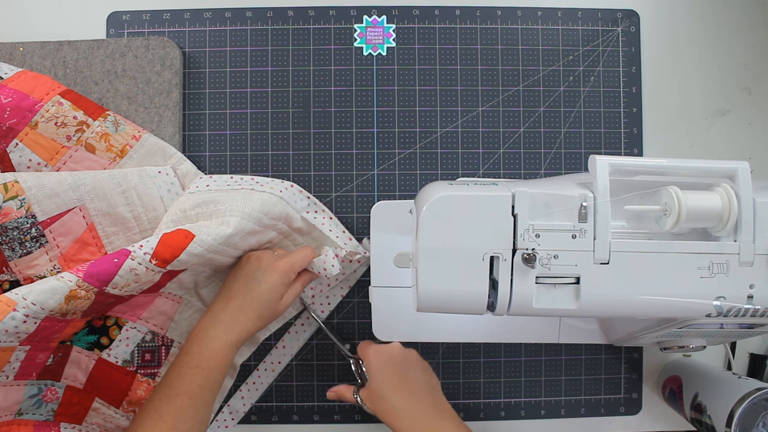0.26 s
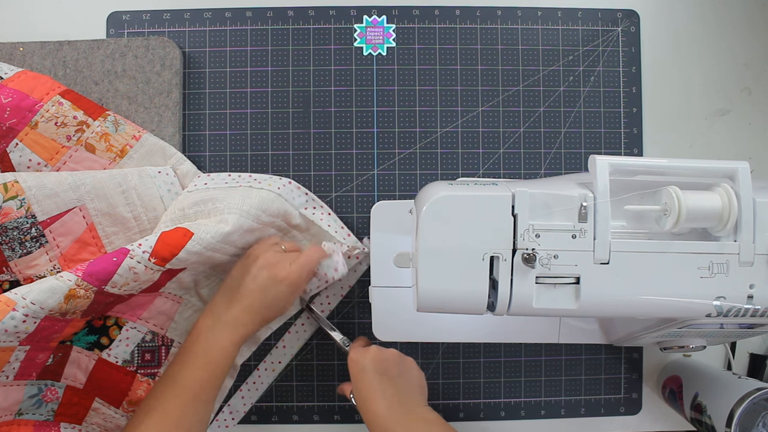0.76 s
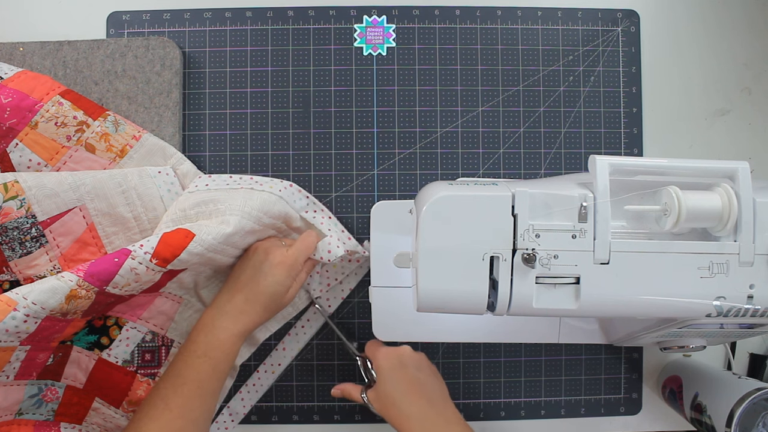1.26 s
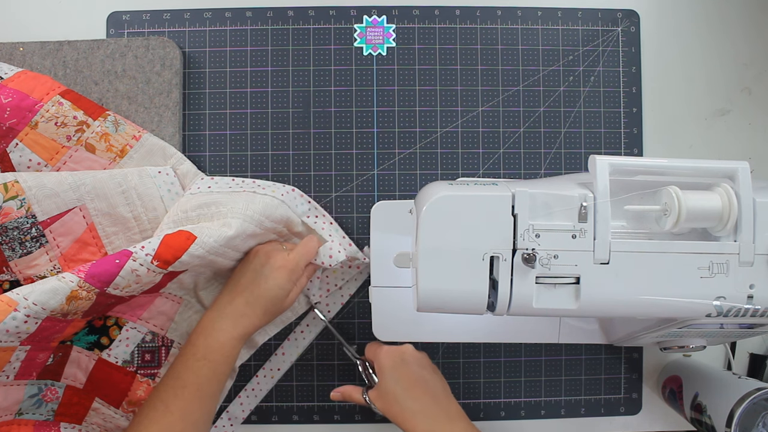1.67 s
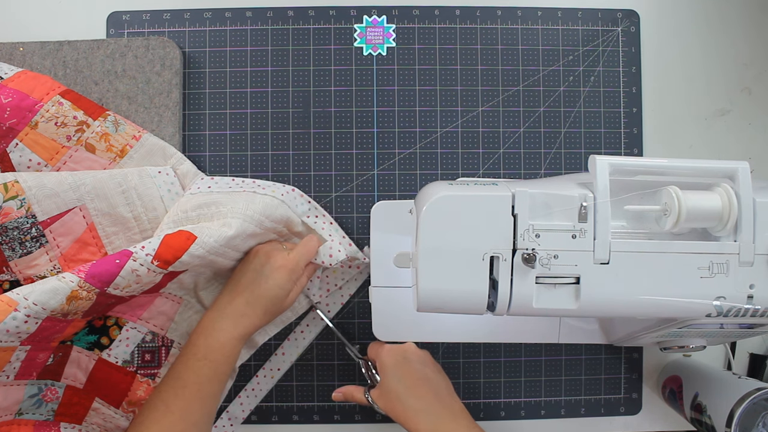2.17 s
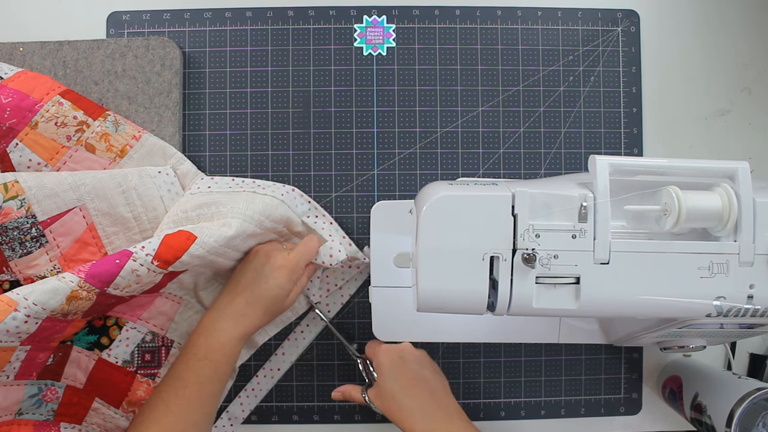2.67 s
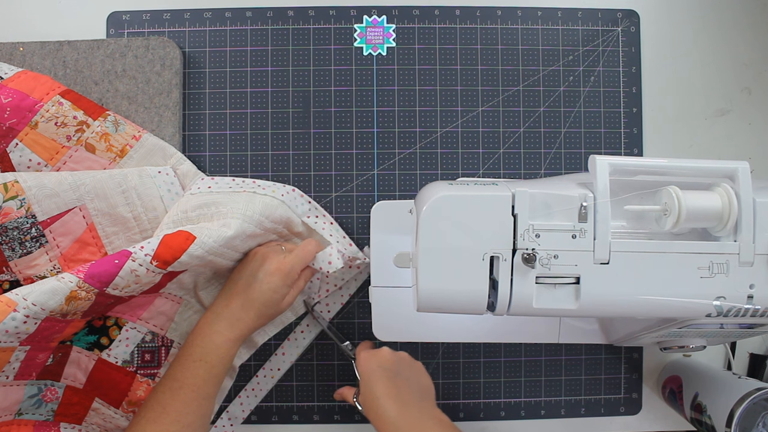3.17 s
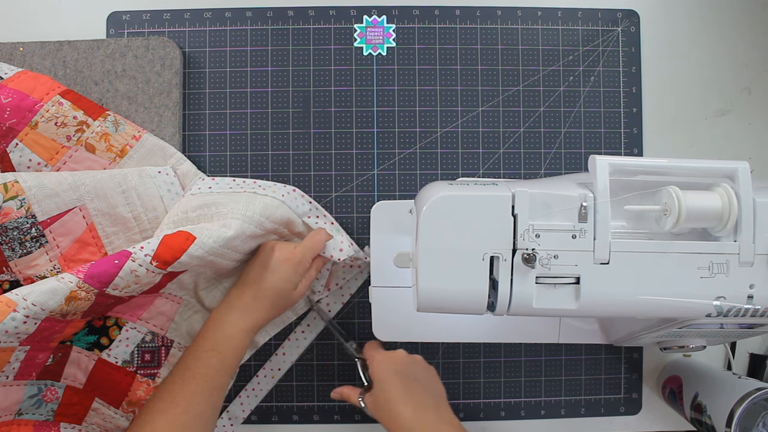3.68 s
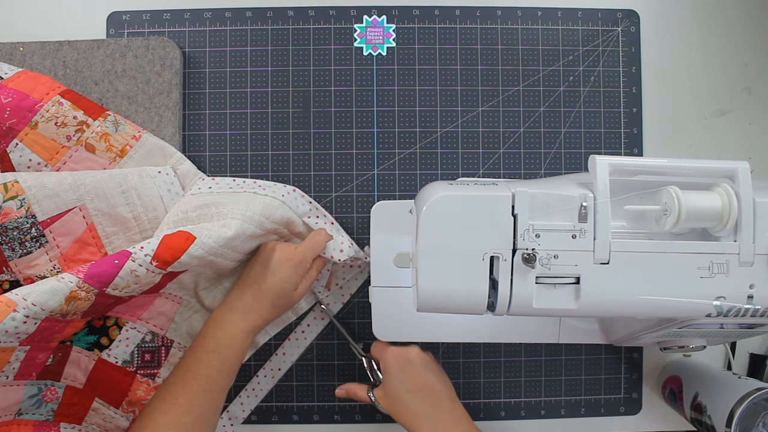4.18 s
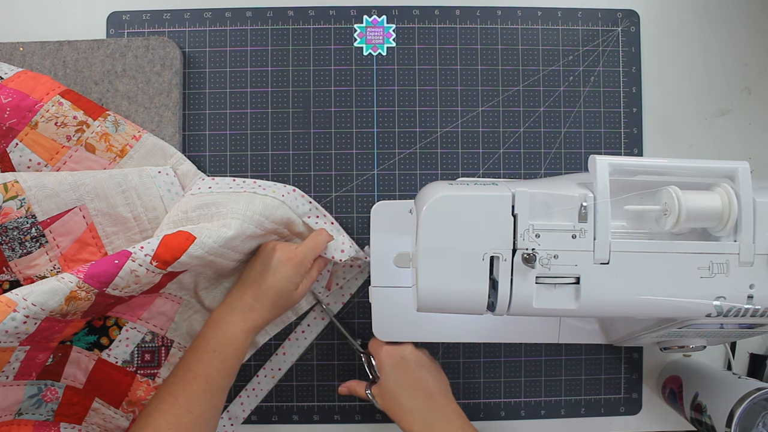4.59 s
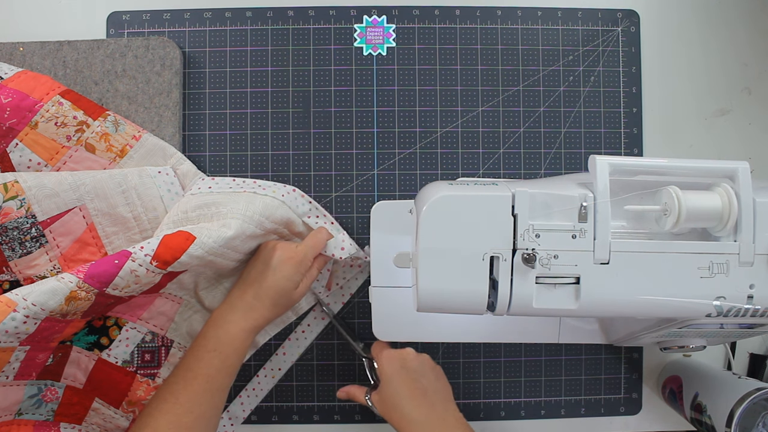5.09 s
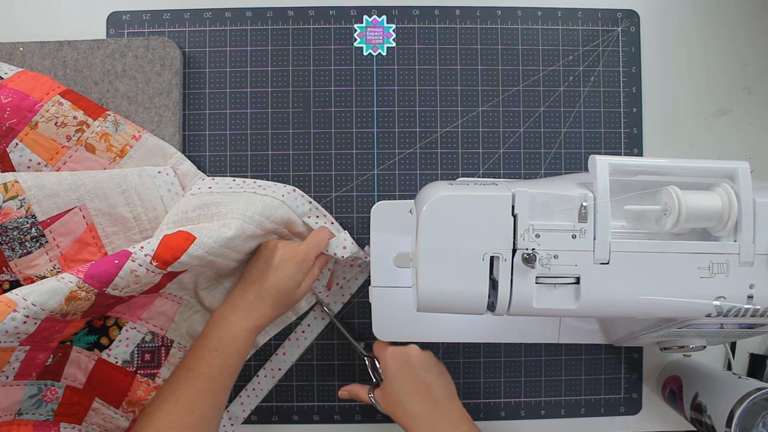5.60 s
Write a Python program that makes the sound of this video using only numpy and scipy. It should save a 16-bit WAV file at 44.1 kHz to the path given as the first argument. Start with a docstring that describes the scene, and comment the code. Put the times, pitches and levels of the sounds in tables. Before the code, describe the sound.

A steady faint hiss with slight low room rumble runs throughout, with barely audible cotton rustle. At about 0.33 s scissor edges scrape through thread, and at 0.35 s the blades snap shut with a loud, bright, very short metallic crack and tiny ping. At 0.48 s a hand thumps the table, dull and woody, followed by small bumps and rustles from 0.6 to 0.9 s and a faint mat tap at 1.0 s. Around 1.64 s the handles knock with a hollow click. Quiet follows, with tiny touches near 2.4 s. At 2.84 s a crunchy scrape leads into the second snap, the loudest and brightest. Soft taps and bumps cluster from 3.0 to 3.4 s, with a slight scrape at 3.6 s. At 4.5 s a thin squeaky scrape precedes a much weaker snip at 4.57 s, then faint scrapes until 4.85 s. Mostly hiss remains, with a barely perceptible rub at 5.4 s. Small room, one overhead microphone.

```python
"""A steady hiss and a faint rustle of cloth come first; then large steel scissors snip a quilt seam.
The scissors are mode sums and shaped noise: edges scrape through thread, blades snap shut and ring briefly.
Hands bump the sewing table (damped modes), tap and rub the cutting mat (resonant noise) and shift the quilt;
the handles knock. A small quiet room answers with decaying noise, under one overhead microphone."""
import sys
import numpy as np
from scipy import signal
from scipy.fft import rfft, irfft, next_fast_len
from scipy.io import wavfile
from scipy.ndimage import uniform_filter1d, map_coordinates

SR = 44100
rng = np.random.default_rng(int(sys.argv[2]) if len(sys.argv) > 2 else 0)


def put_to_file(sound):
    """Save the sound as 16-bit audio at rate SR, in the file named by the first command-line argument."""
    columns = np.atleast_2d(sound).T  # one column per channel
    safe = np.clip(columns, -1, 1)
    whole_steps = np.round(safe * 32767)
    wavfile.write(sys.argv[1], SR, whole_steps.astype(np.int16))


N = 257720
T = np.arange(SR // 2) / SR  # time within one event, s

# Still room, relative spectrum: frequency_hz, density_db (per Hz)
STILL_SPECTRUM = [(12, -19), (20, -11), (55, -9), (113, -2.5), (181, -6), (284, -3.5), (335, -5.5),
                  (570, -8), (733, -8), (843, -9.5), (916, -9.5), (2000, -11), (5470, -12), (13700, -17),
                  (15800, -22)]
STILL_DB = -61  # rms level
# Reverberation of the room: frequency_hz, t60_s
ROOM_DECAY = [(120, 0.23), (600, 0.39), (2500, 0.093), (5000, 0.18), (13000, 0.13), (16000, 0.052)]
TOP_HZ = 15900  # band limit of the recorder

# Hands shifting the quilt over the mat: middle_s, half_length_s, rustle_db, rub_db, rub_pitch_hz
STROKES = [(.1, 0.062, -63, -83, 892), (.57, 0.14, -62, -66.5, 755), (.695, 0.034, -65, -54, 740),
           (.785, 0.033, -59, -65, 754), (0.892, 0.054, -56, -65, 1000), (1.16, 0.053, -63, -78, 900),
           (1.4, .13, -60.5, -71.5, 910), (2.44, 0.095, -75, -70.5, 950), (3.26, 0.22, -62.5, -70, 795),
           (3.5, 0.081, -69.5, -67, 4900), (4.425, .06, -69, -68.5, 1010), (5.435, 0.03, -78.5, -69, 920)]
# Cloth friction, relative spectrum: frequency_hz, density_db (per Hz)
CLOTH_SPECTRUM = [(100, -1.5), (400, -1.5), (1000, -0.5), (2000, 0), (5000, -4), (9000, -10), (14000, -5),
                  (16000, -14)]

# Fingertips tapping the cutting mat: start_s, level_db, pitch_hz, tick_db
TAPS = [(0.4704, -58, 1180, -47), (1.0118, -51, 1160, -54), (2.376, -60.5, 1200, -62),
        (3.187, -56, 990, -59), (3.246, -52, 815, -67), (3.297, -56, 850, -63)]
NUDGE_DB, NUDGE_HZ = -2.5, 1000  # the table under a tap: level over the tock, softness cut-off
# Hard contact on the mat, relative spectrum: frequency_hz, density_db (per Hz)
TICK_SPECTRUM = [(600, 7.5), (1400, -4), (2200, 4.5), (5000, -0.5), (9000, -7.5), (16000, -3)]

# Handles knocking as the grip shifts: start_s, level_db
CLACKS = [(1.6442, -40), (1.6525, -53)]
# Modes of the handles: frequency_hz, relative_level_db, t60_s
HANDLE_MODES = [(660, -5.5, 0.18), (1264, -13, 0.087), (1850, -1, 0.038), (2045, -0.5, 0.047),
                (2935, -4.5, 0.11), (4060, -0.5, 0.034), (5660, -11, .06), (6900, -3, 0.016),
                (7500, 8, 0.015), (10100, -18, 0.097), (14200, -13, .04)]

# Hands and scissors bumping the table: start_s, level_db (before softening), softness_cutoff_hz, tick_db
BUMPS = [(.236, -51, 139, -80), (.477, -19.5, 380, -64), (.4944, -34.5, 348, -72), (.670, -36, 660, -61),
         (.7061, -34.5, 570, -48.5), (.773, -41, 548, -53), (2.468, -50, 402, -64), (3.04, -39.5, 148, -78),
         (3.305, -37, 610, -49.5), (3.354, -46.5, 450, -80)]
# Modes of the table: frequency_hz, relative_level_db, t60_s
TABLE_MODES = [(96.5, -39, 0.18), (121, -8, 0.24), (197, -5, 0.15), (242.2, 2.5, 0.094),
               (292, -17.5, 0.075), (379, -2, 0.051), (479, -4.5, 0.064), (521.7, 1, 0.093),
               (577, -35, 0.03), (715, 1, 0.043), (832, -11, 0.15)]

# Edges scraping over each other: peak_s, level_db, rise_s, crunch_db (dull thread crunch over the squeak)
SCRAPES = [(.145, -59, .003, 2), (.332, -37, 0.0016, -8.5), (.597, -52.5, .0034, 2),
           (1.028, -58.5, .005, -8), (2.787, -55, .002, -2), (2.801, -52.5, .0037, -6),
           (2.8386, -34, 0.0026, -4), (3.608, -52, 0.0052, 1), (4.501, -41, .0067, -16),
           (4.674, -55.5, .0059, -1), (4.847, -56, .004, -10)]
SCRAPE_FALL_S = 0.0022  # the edges stop this quickly
# The table's jolt: level over the crunch, softness cut-off, contact tick over the crunch
JOLT_DB, JOLT_HZ, JOLT_TICK_DB = -2.5, 590, -20
# Resonances of the sliding edges: frequency_hz, width_hz, level_db
EDGE_RESONANCES = [(3850, 1200, -16.5), (8200, 920, -10), (9930, 290, -3), (11990, 380, 1),
                   (15400, 880, -11.5)]
# Thread crunch, relative spectrum: frequency_hz, density_db (per Hz)
CRUNCH_SPECTRUM = [(200, -27), (1200, 3.5), (2500, 0), (5000, 1), (9000, -15), (16000, -2.5)]

# Blades snapping shut: start_s, crack_level_db, brightness_db (at 13 kHz),
# ping_hz (set by the opening), ping_db (over the crack), ping_t60_s
SNAPS = [(0.3484, -19.5, -3.5, 4510, -26.5, 0.089), (2.8495, -17.5, -0.5, 4544, -23, 0.1),
         (4.5723, -34.5, -3.5, 4130, -14, 0.046)]
RECOIL_DB, RECOIL_HZ = -30, 350  # a snap recoils into the table: level over the snap, softness cut-off
# Modes of the blades: frequency_hz, relative_level_db, t60_s
STEEL_MODES = [(2612, -8, 0.039), (3480, -10, 0.033), (4230, -5, 0.021), (4640, -15, 0.03),
               (5410, -10.5, 0.039), (5670, -20, 0.03), (6310, -16.5, 0.062), (6490, -15, 0.027),
               (7280, -21, 0.036), (7750, -13.5, 0.031), (9090, -10, 0.037), (10480, -8, 0.028),
               (11760, 2, 0.022), (12300, -23, 0.037), (12120, -31, 0.014), (13170, 5, .03),
               (12460, -24, .016), (14140, -30, .042), (12400, -16, .035), (14900, -30, .035)]
# Steel impact, relative spectrum: frequency_hz, density_db (per Hz)
CRACK_SPECTRUM = [(300, -12), (1400, -14), (2500, -9), (4500, -26), (6500, 3), (8500, -9.5), (10500, -3),
                  (13200, 15), (14500, 3.5), (16000, 0)]


def amp(db):
    """Decibel law: twenty decibels are a tenfold amplitude."""
    return 10 ** (np.asarray(db) / 20)


def unit(x):
    """Mean-square normalisation: scale to rms 1."""
    return x / np.sqrt(np.mean(x ** 2) + 1e-20)


def burst(x):
    """Short-time power: scale an event so that its loudest 3 ms have rms 1."""
    power = uniform_filter1d(x ** 2, size=128)
    return x / np.sqrt(power.max() + 1e-20)


def along(points, hz):
    """Logarithmic frequency scale: interpolate (Hz, value) points along it."""
    point_hz, value = np.transpose(points)
    return np.interp(np.log(hz + 1), np.log(point_hz + 1), value)


def filtered(x, response):
    """Linear filtering: multiply the spectrum of x by a response of frequency."""
    size = next_fast_len(len(x) + SR // 4)
    spectrum = rfft(x, size) * response(np.fft.rfftfreq(size, 1 / SR))
    return irfft(spectrum, size)[:len(x)]


def noise(spectrum, size):
    """Spectral shaping: white noise coloured by a spectrum, at rms 1."""
    return unit(filtered(rng.standard_normal(size), lambda hz: amp(along(spectrum, hz))))


def resonance(f, hz, width):
    """Damped oscillator: the response peaks at hz with the given bandwidth."""
    return 1j * f * width / (hz * hz - f * f + 1j * f * width)


def wobble(rate):
    """Slow random modulation: a smooth curve through `rate` random knots a second."""
    knots = rng.standard_normal(int(N * rate / SR) + 4)
    return map_coordinates(knots, [np.arange(N) * rate / SR])


def swell(t, half):
    """Gaussian stroke speed at time t from its middle: the hand gathers and eases off evenly."""
    return np.exp(-(t / half) ** 2)


def strike(rise, t60):
    """Exponential damping: a blow rises quickly, then falls 60 dB in every t60 seconds."""
    return (1 - np.exp(-T / rise)) * amp(-60 * T / t60)


def ring(modes, rise, scatter_db, blur_hz=20):
    """Modal superposition: one row per damped mode, its strength scattered and its phase drifting."""
    hz, db, t60 = np.transpose(modes)[:, :, None]
    strength = amp(db + scatter_db * rng.standard_normal(hz.shape))
    # the shifting grip blurs the high modes most: blur_hz is the line width at 10 kHz
    width = blur_hz * hz / 10000
    steps = rng.standard_normal((len(hz), len(T)))
    drift = np.cumsum(steps, axis=1) * np.sqrt(2 * np.pi * width / SR)
    return strength * strike(rise, t60) * np.sin(2 * np.pi * hz * T + drift)


def in_room(x, near_db, tail_db):
    """Reverberation: direct sound, quick scatter from table top and sewing machine, then the room's tail."""
    hz, t, grains = signal.stft(rng.standard_normal(len(T)), SR, nperseg=256)
    decay = amp(-60 * t / along(ROOM_DECAY, hz)[:, None])
    tail = signal.istft(grains * decay, SR, nperseg=256)[1][:len(T)]
    tail *= 1 - np.exp(-(T / 0.0034) ** 2)  # the tail builds up over a few milliseconds
    near = rng.standard_normal(len(T)) * strike(0.0091, 0.057)
    response = amp(near_db) * near / np.linalg.norm(near)
    response += amp(tail_db) * tail / np.linalg.norm(tail)
    return x + signal.fftconvolve(x, response)[:len(x)]


def add(track, s, sound):
    """Linear superposition: mix a sound in from time s, or from zero if s is negative."""
    part = track[max(round(s * SR), 0):][:len(sound)]
    part += sound[:len(part)]


def still_room():
    """Stationary noise: steady microphone hiss over a faint low room rumble."""
    return amp(STILL_DB) * noise(STILL_SPECTRUM, N)


def cloth():
    """Dry friction: cotton rubs on cotton with each stroke, and its fibres catch unevenly."""
    t = np.arange(N) / SR
    sliding = sum(amp(db) * swell(t - s, half) for s, half, db, rub_db, hz in STROKES)
    catching = amp(1.8 * wobble(45) + 1.44 * wobble(700))
    return sliding * unit(noise(CLOTH_SPECTRUM, N) * catching)


def rubs():
    """Friction-driven resonance: each stroke drags over the mat and swells in one broad resonance."""
    out, lead = np.zeros(N), 1 / 4
    for s, half, cloth_db, db, hz in STROKES:
        drag = rng.standard_normal(len(T))
        friction = unit(filtered(drag, lambda f: resonance(f, hz, 0.29 * hz) ** 2))
        add(out, s - lead, amp(db) * friction * swell(T - lead, half))
    return out


def taps():
    """Heavily damped resonance: a fingertip's brief touch gives a short tock."""
    out = np.zeros(N)
    for s, db, hz, tick_db in TAPS:
        touch = rng.standard_normal(len(T)) * strike(0.00037, 0.03)
        tock = burst(filtered(touch, lambda f: resonance(f, hz, 0.5 * hz) ** 2))
        add(out, s, amp(db) * in_room(tock, near_db=-10, tail_db=-10))
    return out


def clacks():
    """Modal impact: the handles give a lower, hollow click with a noisy contact tick."""
    out = np.zeros(N)
    for s, db in CLACKS:
        body = burst(ring(HANDLE_MODES, rise=0.00038, scatter_db=1.0).sum(0))
        tick = burst(noise(CRUNCH_SPECTRUM, len(T)) * strike(0.00036, 0.088))
        click = amp(-1) * body + amp(-6) * tick
        add(out, s, amp(db) * in_room(click, near_db=-12, tail_db=-13))
    return out


def table_blows():
    """Reaction forces: the table takes bumps, a jolt per scrape, a recoil per snap, a nudge per tap."""
    jolts = []
    for s, db, rise, crunch_share_db in SCRAPES:
        crunch_db = db + crunch_share_db
        jolts.append((s, crunch_db + JOLT_DB, JOLT_HZ, crunch_db + JOLT_TICK_DB))
    recoils = [(s, db + RECOIL_DB, RECOIL_HZ, -np.inf) for s, db, *tone in SNAPS]  # no tick
    nudges = [(s, db + NUDGE_DB, NUDGE_HZ, tick_db) for s, db, hz, tick_db in TAPS]
    blows = list(BUMPS) + jolts + recoils + nudges
    return [blow for blow in blows if blow[1] > STILL_DB]  # thuds no louder than the hiss are left out


def bumps():
    """Contact time limits bandwidth: a soft blow reaches only the table's low modes, a hard one also ticks."""
    out = np.zeros(N)
    for s, db, soft_hz, tick_db in table_blows():
        reach = 1 / np.sqrt(1 + (np.array(TABLE_MODES)[:, 0] / soft_hz) ** 5)
        thud = burst(reach @ ring(TABLE_MODES, rise=0.00054, scatter_db=2))
        thud = filtered(thud, lambda hz: 1 / (1 + 1j * hz / (3 * soft_hz)) ** 2)
        tick = burst(noise(TICK_SPECTRUM, len(T)) * strike(0.00042, 0.072))
        add(out, s, in_room(amp(db) * thud + amp(tick_db) * tick, near_db=-17, tail_db=-17))
    # the thuds carry little deep bass
    bass_cut = signal.butter(4, 95, "highpass", fs=SR, output="sos")
    return signal.sosfilt(bass_cut, out)


def edge_response(f):
    """Parallel resonances: the modes of the sliding edges add with alternating sign."""
    total = 0
    for k, (hz, width, db) in enumerate(EDGE_RESONANCES):
        total = total + (-1) ** k * amp(db) * resonance(f, hz, width)
    return total


def scrapes():
    """Stick-slip friction: tiny slips of edge on edge excite the steel and crush the thread, then stop."""
    out, lead = np.zeros(N), 1 / 20
    for s, db, rise, crunch_db in SCRAPES:
        force = np.exp(-np.maximum((lead - T) / rise, (T - lead) / SCRAPE_FALL_S))
        # slips of widely varied size
        slips = rng.standard_normal(len(T)) * amp(4 * rng.standard_normal(len(T)))
        squeak = burst(filtered(slips * force, edge_response))
        crunch = burst(noise(CRUNCH_SPECTRUM, len(T)) * force)
        scrape = burst(squeak + amp(crunch_db) * crunch)
        add(out, s - lead, amp(db) * in_room(scrape, near_db=-6.5, tail_db=-19.0))
    return out


def snaps():
    """Impact excitation: a hard crack, a cluster of modes that the hand soon damps, and one ping."""
    out = np.zeros(N)
    for s, db, bright_db, ping_hz, ping_db, ping_t60 in SNAPS:
        steel = burst(ring(STEEL_MODES, rise=0.00039, scatter_db=0, blur_hz=90).sum(0))
        crack = burst(noise(CRACK_SPECTRUM, len(T)) * strike(0.0016, 0.01))
        ping = burst(ring([(ping_hz, 0, ping_t60)], rise=0.0002, scatter_db=0).sum(0))
        blow = amp(-5.5) * steel + crack + amp(ping_db) * ping
        # a faster closing is brighter
        tilt = [(7000, 0), (13000, bright_db)]
        blow = filtered(blow, lambda hz: amp(along(tilt, hz)))
        add(out, s, amp(db) * in_room(blow, near_db=-16.5, tail_db=-12))
    return out


def scene():
    """Superposition at one microphone, which feeds both channels."""
    background = still_room() + cloth() + rubs()
    contacts = taps() + clacks() + bumps()
    mono = background + contacts + scrapes() + snaps()
    return np.array([mono, mono])


def record(dry):
    """Band limitation: the recorder's response falls to zero across 200 Hz centred on its limit."""
    def band_limit(hz):
        return np.clip((TOP_HZ - hz) / 200 + 0.5, 0, 1)
    return np.array([filtered(x, band_limit) for x in dry])


dry = scene()
out = record(dry)
put_to_file(out)
```